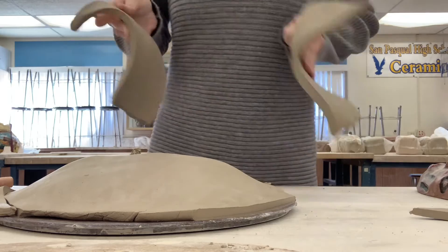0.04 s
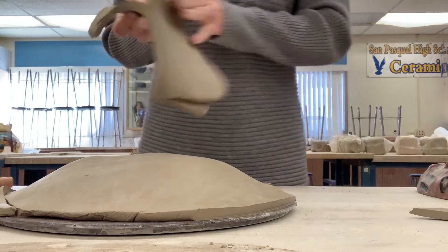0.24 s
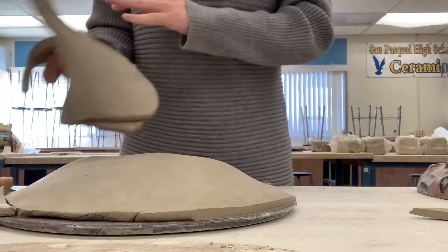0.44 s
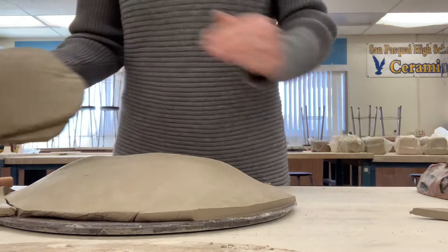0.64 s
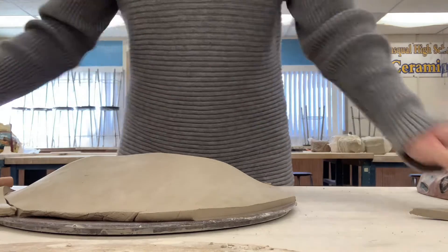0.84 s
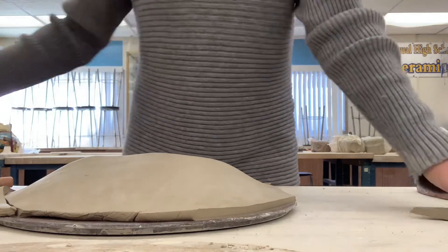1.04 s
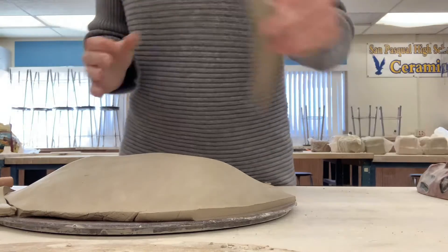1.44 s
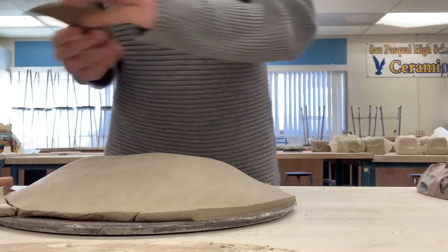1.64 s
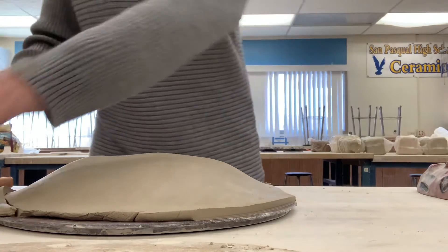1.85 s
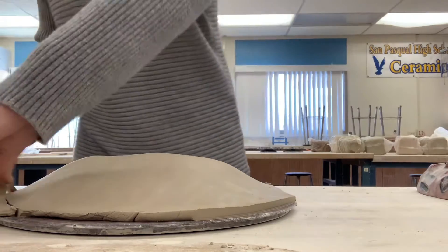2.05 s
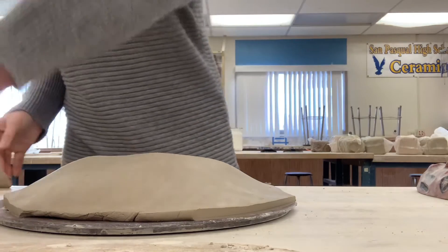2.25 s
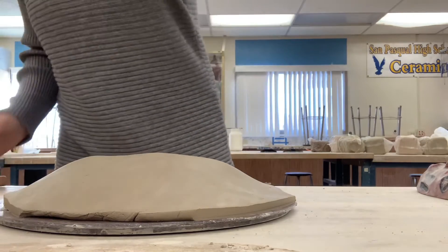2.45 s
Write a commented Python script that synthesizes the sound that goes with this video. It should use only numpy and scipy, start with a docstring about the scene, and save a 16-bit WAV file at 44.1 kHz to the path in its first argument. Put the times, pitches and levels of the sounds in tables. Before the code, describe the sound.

Wet clay is slapped together, then dropped on a table with moist splats and thuds.

```python
"""Wet clay on a work table

Clay strips are slapped together in the hands with a pop of trapped air, then dropped on a table in a
large classroom. Each landing is a moist splat, then the boom of the table top's modes. Sleeves rustle,
two faint swishes pass, something is shoved in short dull scrapes near the end, and ventilation hums."""
import sys
import numpy as np
from scipy import signal
from scipy.fft import rfft, irfft
from scipy.io import wavfile

SR = 44100
rng = np.random.default_rng(int(sys.argv[2]) if len(sys.argv) > 2 else 0)


def digitize_waveform(pressure):
    """Quantize a signal to 16-bit integers and store it at the path in sys.argv[1].

    Rows of a 2-D input are taken as channels; values are limited to [-1, 1].
    """
    field = np.atleast_2d(pressure).T
    bounded = np.clip(field, -1, 1)
    quanta = np.round(bounded * 32767).astype(np.int16)
    wavfile.write(sys.argv[1], SR, quanta)


N = 110250
T = np.arange(N) / SR
HZ = np.maximum(np.arange(N // 2 + 1) * SR / N, 1)
TREBLE_HZ = 2585  # shelf corner


def from_db(db):
    """Decibels to gain."""
    return 10 ** (np.asarray(db) / 20)


def unit_rms(x):
    """Scale to rms 1."""
    return x / np.sqrt(np.mean(x ** 2) + 1e-20)


def at_hz(points, hz):
    """Read a table on a log-frequency axis."""
    freqs_hz, values = np.transpose(points)
    return np.interp(np.log(hz), np.log(freqs_hz), values)


def gain_curve(points):
    """A dB curve as gain in time."""
    return from_db(np.interp(T, *np.transpose(points)))


def pan(db):
    """Stereo gains; positive is left."""
    return from_db([[db / 2], [-db / 2]])


def drift(rate_hz):
    """Smooth random signal, rms 1."""
    return unit_rms(irfft(rfft(rng.standard_normal(N)) / (1 + (HZ / rate_hz) ** 4), N))


def two_ears():
    """White noise spectra for both ears, correlated by the room."""
    # (frequency [Hz], left-right correlation)
    likeness = [(60, 0.16), (300, 0.098), (1000, -0.2), (5000, 0.069), (9000, -0.98), (14000, 0.27)]
    mid, side = rfft(rng.standard_normal((2, N)))
    alike = np.clip(at_hz(likeness, HZ), -1, 1)
    return np.sqrt(1 + alike) * mid + np.sqrt(1 - alike) * side * [[1], [-1]]


def noise(spectrum, treble_db=0):
    """Coloured stereo noise of rms 1, then a treble shelf."""
    x = unit_rms(irfft(from_db(at_hz(spectrum, HZ)) * two_ears(), N))
    return irfft(rfft(x) * from_db(treble_db / (1 + (TREBLE_HZ / HZ) ** 2)), N)


def swell(peak_s, rise_s, t60_s):
    """Envelope: up 20 dB per rise time to 1, then exponential decay."""
    db = np.minimum(20 * (T - peak_s) / rise_s, -60 * (T - peak_s) / t60_s)
    return from_db(np.maximum(db, -200))


def swells(rows):
    """Sum of swells, each at its own level."""
    return sum(from_db(db) * swell(peak_s, rise_s, t60_s) for peak_s, db, rise_s, t60_s in rows)


def push(start_s, length_s):
    """Half sine of force, height 1."""
    return np.sin(np.pi * np.clip((T - start_s) / length_s, 0, 1))


def ring(force, hz, t60_s):
    """One mode: a unit click starts a decaying sine of height 1."""
    r, w = np.exp(-np.log(1000) / (t60_s * SR)), 2 * np.pi * hz / SR
    return signal.lfilter([0, np.sin(w)], [1, -2 * r * np.cos(w), r * r], force + 1e-18)


def slap():
    """Clay meets clay: light touches, then a pop of trapped air and a wet spray, in a moist squeeze."""
    # (time [s], level [dB])
    contacts = [(0.2004, -22.5), (0.2012, -26), (0.2090, -27), (0.2126, -1)]
    # air pocket and wet skin: (frequency [Hz], gain [dB], t60 [s])
    modes = [(800, -23, 0.0028), (1268, -4, 0.0077), (1740, -5.5, 0.0063), (3700, -22.5, 0.0034),
             (5130, -17.5, 0.0053), (7917, -40, 0.0036), (14327, -34, 0.004)]
    # (peak time [s], level [dB], rise [s], t60 [s])
    squeezes = [(0.2, -31, 0.0047, .02), (0.224, -40, .008, 0.022)]
    # (frequency [Hz], density [dB])
    wet_spectrum = [(100, -14), (310, -1.5), (470, -20), (700, -7.5), (1300, 6.5), (2000, -6.5),
                    (3000, -6.5), (5500, -17), (9000, -30.5), (14500, -24), (17000, -36)]
    clicks = np.zeros(N)
    for at_s, db in contacts:
        clicks[int(at_s * SR)] += from_db(db)
    pop = sum(from_db(db) * ring(clicks, hz, t60_s) for hz, db, t60_s in modes)
    pop = signal.sosfilt(signal.butter(3, 620, "high", fs=SR, output="sos"), pop)
    spray = sum(from_db(db - 22) * swell(at_s, rise_s=0.0008, t60_s=0.044) for at_s, db in contacts)
    return pop + (spray + swells(squeezes)) * noise(wet_spectrum)


def splats():
    """A wet face closes on the table in a grainy burst; blow and grains ring a hollow knock."""
    # (time [s], level [dB], rise [s], t60 [s], treble [dB], pan [dB], blow [dB], lowest mode [dB])
    landings = [(0.8325, -32, 0.0021, 0.029, -12.5, 4.5, -55, 5),
                (0.863, -53, 0.033, 0.29, -0.5, 0, -57, 8),
                (0.896, -38.5, 0.022, 0.037, -29, 10.5, -72, -6),
                (0.9030, -31, 0.0044, 0.021, 5, 3, -23.5, -24),
                (0.9427, -32, 0.001, 0.018, 3.5, 2, -34, -7),
                (1.8592, -32, 0.0068, 0.041, 2.5, 3, -28, -0.5),
                (2.045, -43.5, 0.0022, 0.16, -17, 4, -47, -7)]
    # (frequency [Hz], density [dB])
    spectrum = [(150, 8.5), (400, 1.5), (520, -7.5), (830, 2.5), (1080, 2), (1450, 4.5), (1800, -11),
                (2500, -11), (4000, -16), (6500, -12), (9500, -22.5), (14500, -16), (17000, -37)]
    # (frequency [Hz], gain [dB], t60 [s])
    knock_modes = [(709, -7, 0.077), (1046, -2.5, 0.028), (1387, -14.5, 0.028), (1762, -6, 0.028),
                   (3074, -26, 0.042), (3880, -14.5, 0.0041)]
    grain_db, grain_drive_db = 3, -25
    grain = unit_rms(from_db(grain_db * drift(250)))
    out = 0
    for at_s, db, rise_s, t60_s, treble_db, pan_db, blow_db, lowest_db in landings:
        contact = from_db(db) * grain * swell(at_s, rise_s, t60_s)
        blow = from_db(blow_db) * (np.arange(N) == int(at_s * SR))
        force = blow + from_db(grain_drive_db) * contact * rng.standard_normal(N)
        knock = 0
        for k, (hz, mode_db, mode_t60_s) in enumerate(knock_modes):
            # the lowest mode's gain depends on where the strip lands
            gain = from_db(mode_db + lowest_db * (k == 0) + treble_db * (hz > TREBLE_HZ))
            knock += gain * ring(force, hz, mode_t60_s)
        out += pan(pan_db) * (contact * noise(spectrum, treble_db) + knock)
    return out


def table_boom():
    """The clay's weight pushes the top into ringing; shorter pushes excite more high modes."""
    # (time [s], impulse [dB], length [s], shudder [dB])
    thuds = [(0.8382, -23, 0.0099, -42), (0.885, -42, 0.0021, -38.5), (0.9064, -34.5, 0.0022, -31),
             (0.943, -39, 0.0023, -32), (1.8629, -23, 0.00476, -30.5)]
    # (frequency [Hz], gain [dB], t60 [s], pan [dB])
    modes = [(53, -13, 0.079, 7), (59.66, -3, 0.83, 0), (82.6, -3, 0.37, 11), (141.9, 1.5, 0.19, 2),
             (172.7, 3, 0.12, -5.5), (265, -4, 0.25, -15), (347.3, -1, 0.28, 13.5), (445, -14, 0.31, -6),
             (612, 6, 0.24, 1)]
    # dense modes as noise: (frequency [Hz], density [dB])
    shudder_spectrum = [(40, -45), (100, 3.5), (200, -1), (350, -8.5), (600, -12.5), (1200, -19),
                        (2500, -35.5), (6000, -73)]
    rise_s = 0.0032
    force = shudder = 0
    for at_s, impulse_db, length_s, shudder_db in thuds:
        pulse = push(at_s, length_s)
        force += from_db(impulse_db) * pulse / pulse.sum()
        shudder += from_db(shudder_db) * swell(at_s + rise_s, rise_s, t60_s=0.17)
    boom = sum(from_db(db) * pan(pan_db) * ring(force, hz, t60_s) for hz, db, t60_s, pan_db in modes)
    return boom + shudder * noise(shudder_spectrum)


def scrapes():
    """Brief bursts of friction excite a few woody resonances."""
    # (time [s], length [s], level [dB], tilt [dB/octave])
    shoves = [(2.235, 0.023, -42, 8), (2.259, 0.0085, -43.5, 6.5), (2.326, 0.022, -48, -1.5),
              (2.346, 0.014, -44.5, 1), (2.431, 0.038, -48, -15)]
    # (frequency [Hz], level [dB], t60 [s])
    modes = [(615.5, 2.5, 0.075), (768, -5.5, 0.031), (896, -3.5, 0.019), (1057, -6, 0.016),
             (1170, -6, 0.1), (1400, -9.5, 0.027), (1750, -6.5, 0.037)]
    lowpass = signal.butter(6, 1950, fs=SR, output="sos")
    out = 0
    for at_s, length_s, db, tilt_db_oct in shoves:
        friction = push(at_s, length_s) * rng.standard_normal(N)
        force = np.diff(friction, prepend=0)
        body = 0
        for k, (hz, mode_db, t60_s) in enumerate(modes):
            gain = (-1) ** k * from_db(mode_db + tilt_db_oct * np.log2(hz))
            body += gain * unit_rms(ring(force, hz, t60_s))
        out += from_db(db) * unit_rms(signal.sosfilt(lowpass, body)) * np.sqrt(length_s * SR / N)
    return pan(4.5) * out


def handling():
    """Sleeves and sliding clay rustle; sticky clay ticks."""
    # (peak time [s], level [dB], rise [s], t60 [s], treble [dB])
    rustles = [(0.192, -59, 0.041, 0.18, -2.5), (1.0, -58, 0.069, 0.36, -27),
               (1.131, -59.5, 0.17, 0.3, -1.5), (1.961, -59, 0.046, 0.47, -3)]
    # (frequency [Hz], density [dB])
    rustle_spectrum = [(200, -2), (1000, 2.5), (2000, -3), (3000, -2), (5500, -8.5), (9000, -27.5),
                       (14000, -14), (17000, -28)]
    # (time [s], level [dB], t60 [s])
    ticks = [(2.26, -70.5, 0.043), (2.443, -70, 0.039), (2.453, -65, 0.096)]
    # (frequency [Hz], density [dB])
    tick_spectrum = [(2000, -29.5), (5000, -19), (7000, 10.5), (9500, -7), (13500, 4), (17000, -22)]
    rustle = sum(from_db(db) * swell(at_s, rise_s, t60_s) * noise(rustle_spectrum, treble_db)
                 for at_s, db, rise_s, t60_s, treble_db in rustles)
    tick_envelope = sum(from_db(db) * swell(at_s, 0.008, t60_s) for at_s, db, t60_s in ticks)
    return (rustle + tick_envelope * noise(tick_spectrum)) * from_db(2 * drift(150))


def rumble():
    """Shifting weight rumbles through the table."""
    # (time [s], level [dB])
    levels = [(1.9, -82), (2.08, -48.5), (2.21, -61.5), (2.26, -47), (2.35, -49), (2.5, -47.5)]
    # (frequency [Hz], density [dB])
    spectrum = [(25, -22.5), (60, 7.5), (100, -14.5), (230, -0.5), (450, -14.5), (620, -3), (1100, -16.5),
                (2000, -65.5)]
    return gain_curve(levels) * noise(spectrum)


def soft_swishes():
    """Two faint, breathy swishes of air swell and fade."""
    # (peak time [s], level [dB], rise [s], t60 [s])
    swishes = [(1.361, -61, 0.25, 1), (1.79, -68, 0.35, 1)]
    # (frequency [Hz], density [dB])
    spectrum = [(150, 9), (450, -0.5), (580, 1.5), (800, -8), (1500, -2), (2100, -5), (2550, -17),
                (3050, -5.5), (4000, -17.5), (5300, -11), (8500, -30), (15000, -56)]
    return swells(swishes) * from_db(drift(40)) * noise(spectrum)


def peeling():
    """Wet clay peels with a faint, crackly sizzle."""
    # (peak time [s], level [dB], rise [s], t60 [s])
    peels = [(0.249, -64.5, 0.035, 0.47), (1.125, -69, 0.11, 0.19)]
    # (frequency [Hz], density [dB])
    spectrum = [(5000, -24), (10000, -14), (12500, 1), (15000, 0.5), (17000, -16.5)]
    return swells(peels) * from_db(1.7 * drift(200)) * noise(spectrum)


def ventilation():
    """A wavering hum over a dark rush of air."""
    # (time [s], gain [dB])
    hum_gains = [(0, 2), (.32, 1.5), (.66, -5.5), (.73, -19), (.81, 1.5), (1.48, 1), (1.62, 2.5), (2.5, -2)]
    # (frequency [Hz], density [dB])
    air_spectrum = [(20, -12), (55, -2), (110, -3), (170, -14), (260, -21), (500, -29), (1000, -31),
                    (2000, -35), (5500, -43), (9500, -48), (14000, -47), (18000, -55)]
    hum_hz, wander_hz = 97.2, 5.6
    hum_db, waver_db, air_db = -54.5, 1, -61.5
    phase = 2 * np.pi * np.cumsum(hum_hz + wander_hz * drift(13)) / SR
    hum = gain_curve(hum_gains) * from_db(hum_db + waver_db * drift(13)) * np.sin(phase)
    return hum + from_db(air_db) * noise(air_spectrum)


def near_reflections(x):
    """Direct sound plus bounces off table and body; louder and slightly later on the left."""
    # (delay [s], left [dB], right [dB])
    bounces = [(.0017, -26.5, -24.5), (.0052, -28.5, -24), (0.013, -29, -24.5)]
    left_lag_s = 0.000068
    echoes = sum(from_db([[left_db], [right_db]]) * np.interp(T - delay_s, T, x.mean(axis=0))
                 for delay_s, left_db, right_db in bounces)
    lag = np.exp(-2j * np.pi * HZ * np.array([[left_lag_s], [0]]))
    return pan(5) * irfft(rfft(x + echoes) * lag, N)


def classroom(x):
    """A diffuse tail that builds quickly and dies band by band."""
    # (frequency [Hz], t60 [s])
    decays = [(100, 0.85), (500, 0.6), (1400, 1.33), (2300, .8), (3800, 0.91), (6000, 0.61), (13000, 0.17)]
    # (frequency [Hz], gain [dB])
    colour = [(80, 6.5), (250, 5), (600, 5.5), (1500, -1), (3300, 6.5), (6000, 4.5), (9000, -8.5),
              (14000, -3.5)]
    build_s = 0.019
    edges_hz = np.geomspace(40, 17000, 15)
    white = [irfft(two_ears(), N) / np.sqrt(2) for _ in range(2)]
    tail = 0
    for k, (low_hz, high_hz) in enumerate(zip(edges_hz, edges_hz[1:])):
        hz = np.sqrt(low_hz * high_hz)
        fade = np.exp(-np.log(1000) * T / at_hz(decays, hz)) * (1 - np.exp(-T / build_s))
        bandpass = signal.butter(2, [low_hz, high_hz], "band", fs=SR, output="sos")
        band = signal.sosfilt(bandpass, white[k % 2])
        tail += from_db(at_hz(colour, hz)) * band * fade / np.sqrt(np.sum(fade ** 2))
    return signal.fftconvolve(x, tail, axes=1)[:, :N]


def scene():
    """Slap, landings and scrapes feed the room; the quiet sources stay dry."""
    hands, drops, shoves = slap(), splats() + table_boom(), scrapes()
    room = classroom(from_db(-18) * hands + from_db(-14) * drops + from_db(-11.5) * shoves)
    background = pan(4) * (handling() + rumble() + soft_swishes() + ventilation())
    return near_reflections(hands) + drops + shoves + room + background + peeling()


def record(dry):
    """Band limit, 35 Hz to 16.2 kHz."""
    x = signal.sosfilt(signal.butter(4, 35, "high", fs=SR, output="sos"), dry)
    return signal.sosfilt(signal.ellip(10, .1, 80, 16200, fs=SR, output="sos"), x)


dry = scene()
out = record(dry)
digitize_waveform(out)
```